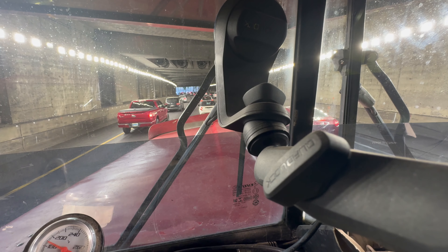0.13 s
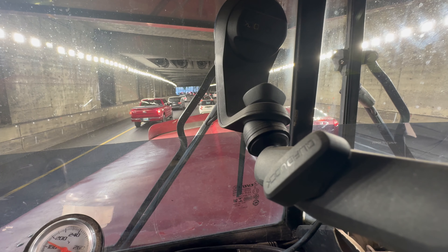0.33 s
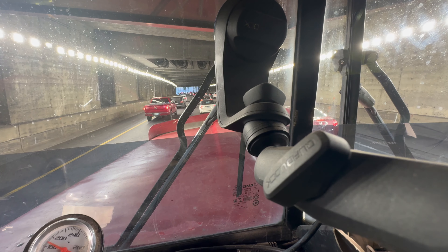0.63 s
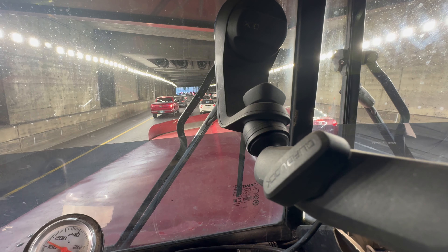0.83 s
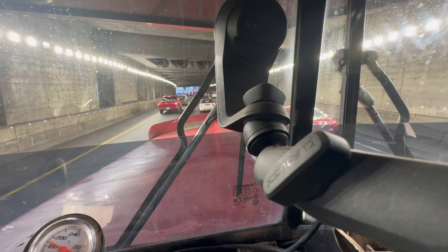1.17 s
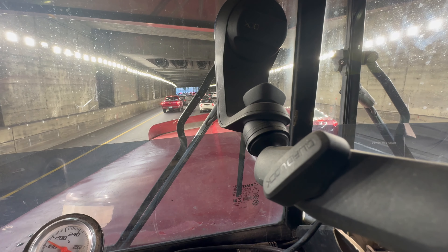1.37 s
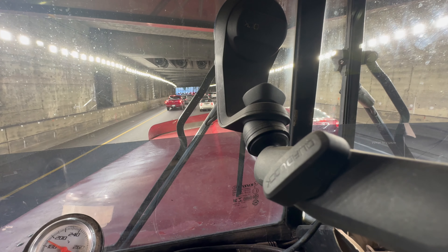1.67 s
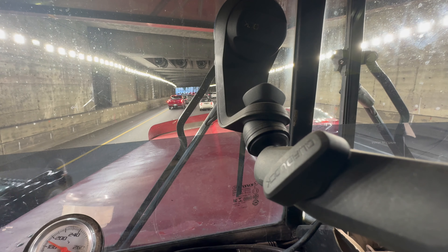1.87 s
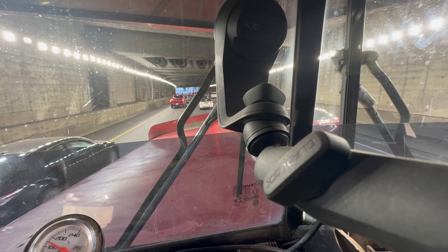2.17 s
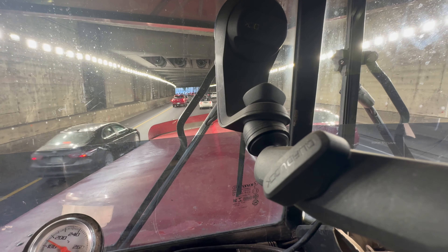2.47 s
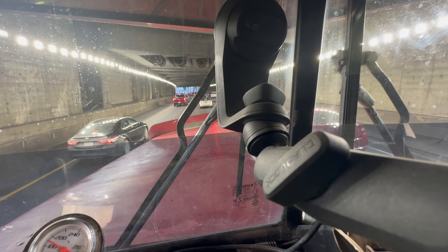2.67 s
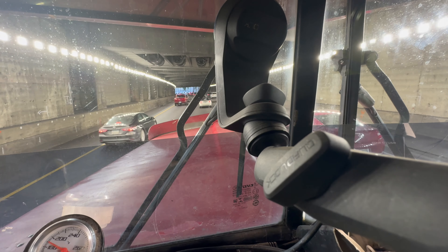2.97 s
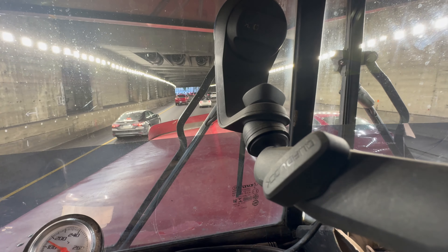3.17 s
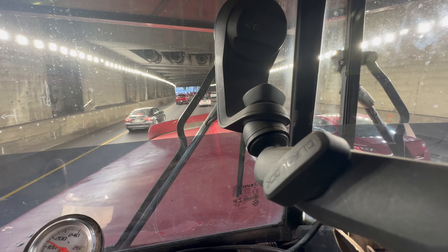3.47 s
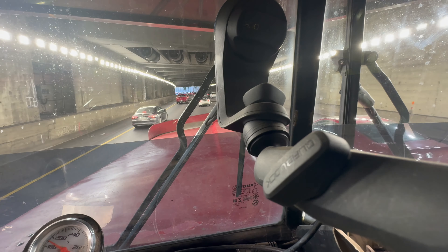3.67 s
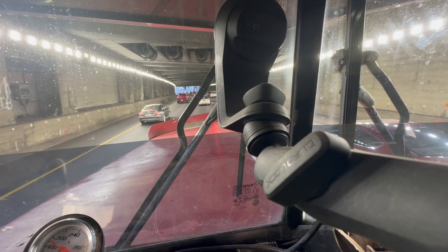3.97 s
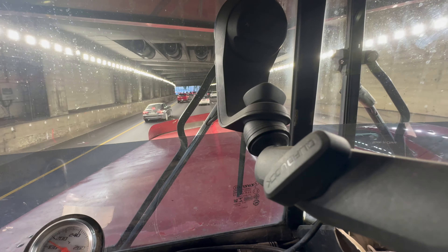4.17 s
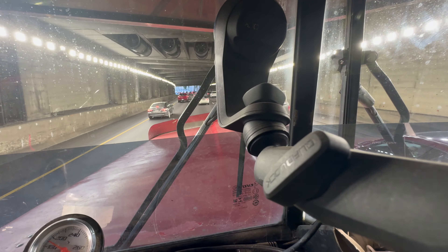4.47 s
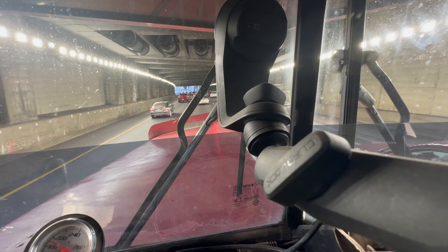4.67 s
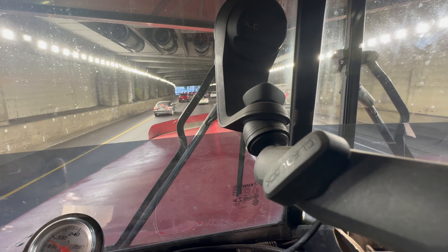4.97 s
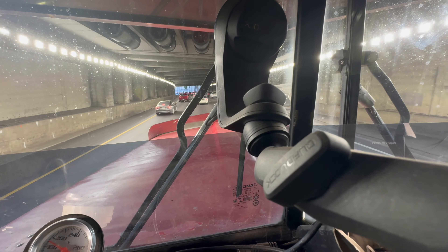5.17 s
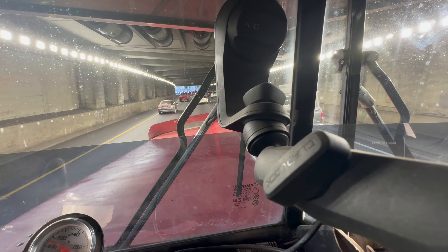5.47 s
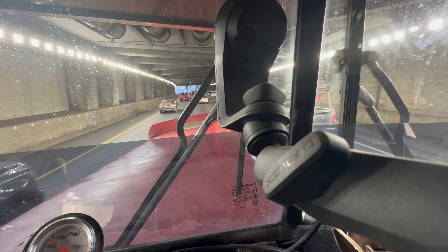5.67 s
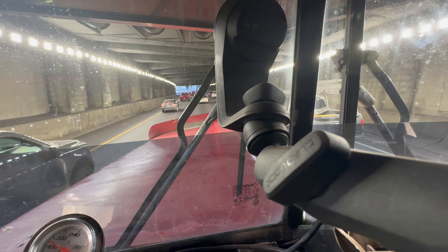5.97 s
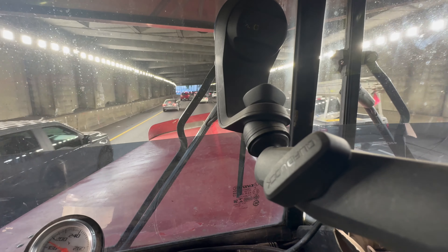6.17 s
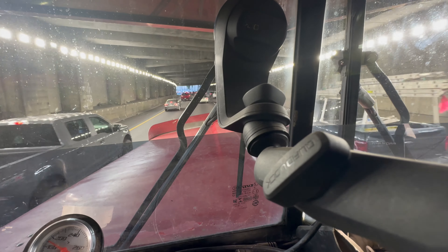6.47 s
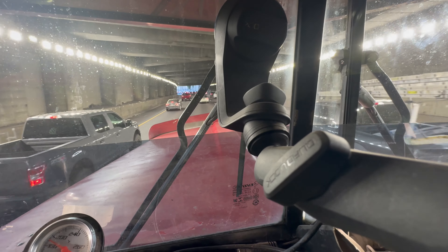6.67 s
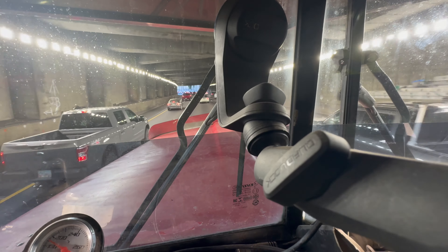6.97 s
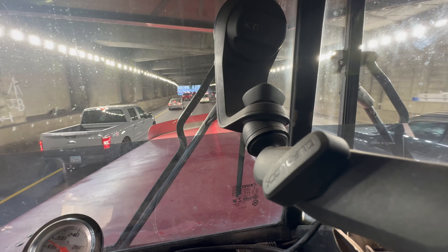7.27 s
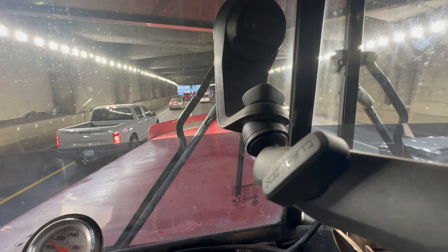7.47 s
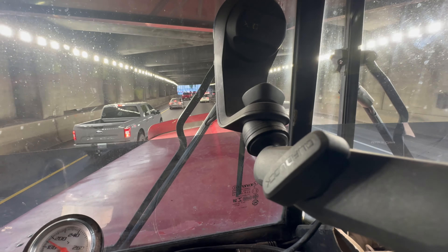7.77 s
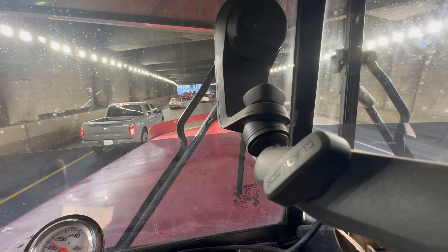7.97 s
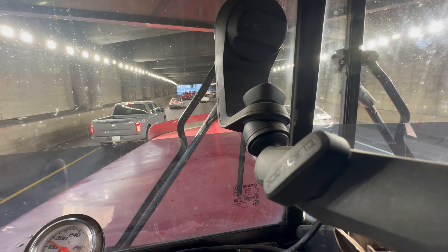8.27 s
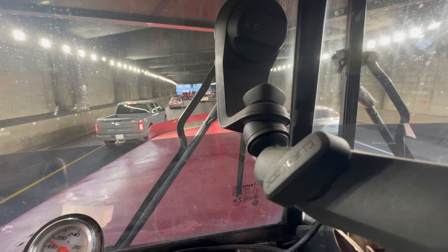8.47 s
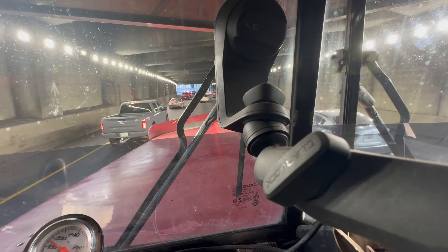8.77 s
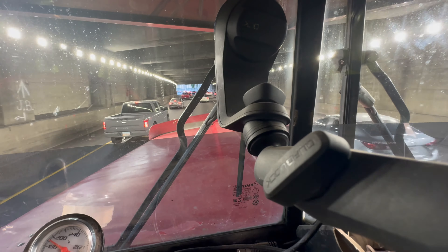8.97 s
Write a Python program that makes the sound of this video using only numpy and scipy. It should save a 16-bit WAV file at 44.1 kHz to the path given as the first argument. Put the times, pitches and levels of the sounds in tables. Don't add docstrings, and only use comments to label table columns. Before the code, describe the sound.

Heard from a stereo microphone on the dashboard of a heavy diesel truck in a tunnel. At first the engine is off load: low rumble, soft clatter, air ticks and dry lever clicks, with a short throttle dab around 0.5 s. From 0.8 to 2.3 s it pulls steadily, low and boomy, with faint gear whine. A hard pull from 2.3 to 3.9 s climbs steeply, with loud raspy exhaust barks and rising turbo whistle and hiss. Around 4.0-4.45 s the load drops; air spits and the lever clicks. The next gear climbs from 4.5 to 5.7 s, barking strongly, then eases. Another pull runs 6.3-7.7 s, ending in a sharp air blow-off near 7.64 s. Spits, small chirps and trim rattles fill the lull until 8.25 s, while tunnel roar swells. A final pull growls upward to the end at about 9.1 s.

```python
import sys
import numpy as np
from scipy import signal
from scipy.fft import rfft, irfft, next_fast_len
from scipy.io import wavfile
from scipy.ndimage import uniform_filter1d

SR = 44100
rng = np.random.default_rng(int(sys.argv[2]) if len(sys.argv) > 2 else 0)


def amplitude_ratio(level_db):
    exponent = np.asarray(level_db, float) / 20
    return 10 ** exponent


def generate_wav(signal):
    frames = np.transpose(np.atleast_2d(signal))
    scaled = np.clip(frames, -1, 1) * 32767
    pcm = np.round(scaled).astype(np.int16)
    wavfile.write(sys.argv[1], SR, pcm)


N = 401751
USUAL_FIRING_HZ, USUAL_TURBO_HZ = 70, 5000


def rms_one(x):
    return x / np.sqrt(np.mean(x ** 2) + 1e-20)


def in_time(rows):
    s, *columns = np.transpose(rows)
    return [np.interp(np.arange(N) / SR, s, column) for column in columns]


def at_hz(points, hz):
    point_hz, value = np.array(points)[:, :2].T
    return np.interp(np.log(hz), np.log(point_hz), value)


def drift(rate):
    r = np.exp(-80 * np.pi * rate / SR)
    slow = signal.lfilter([1], [1, -2 * r, r * r], rng.standard_normal(N // 40 + 2002))[2000:]
    return np.interp(np.arange(N) / 40, np.arange(len(slow)), rms_one(slow))


def resonate(x, hz, width_hz):
    r = np.exp(-np.pi * width_hz / SR)
    poles = [1, -2 * r * np.cos(2 * np.pi * hz / SR), r * r]
    return signal.lfilter([(1 - r * r) / 2, 0, (r * r - 1) / 2], poles, x)


def near(hz, centre_hz, width_hz):
    return 1 / (1 + ((hz - centre_hz) / width_hz) ** 2)


# frequency in Hz, likeness from -1 to 1.
SIDE_LIKENESS = [(45, 0.88), (80, -0.24), (130, -0.96), (170, 0.89), (220, 0.48), (310, -0.27),
                 (1200, -0.77), (1800, 0.18), (2300, 0.092), (9000, -0.1)]
# frequency in Hz, left minus right in dB.
SIDE_LEAN = [(60, -3.5), (110, 2.5), (200, -3), (380, 14), (700, -2), (1290, 0.5), (2380, 1.5), (4400, 5),
             (8120, 9), (15000, -2)]


def stereo_noise(spectrum):
    size = next_fast_len(N)
    hz = np.maximum(np.fft.rfftfreq(size, 1 / SR), 1)
    mid, side = rfft(rng.standard_normal((2, size)))
    alike = np.clip(at_hz(SIDE_LIKENESS, hz), -1, 1)
    lean_db = at_hz(SIDE_LEAN, hz) / 2 * [[1], [-1]]
    pair = np.sqrt(1 + alike) * mid + np.sqrt(1 - alike) * side * [[1], [-1]]
    out = irfft(pair * amplitude_ratio(at_hz(spectrum, hz) + lean_db), size)[:, :N]
    return out / np.sqrt(np.mean(out.mean(0) ** 2))


# time in seconds, firings per second in Hz.
ENGINE_SPEED = [(0.0, 42.26), (0.84, 42.54), (1.22, 50.8), (2.24, 50.5), (2.5, 45.07), (2.72, 46.43),
                (3.0, 60.03), (3.8, 80.65), (4.18, 82.14), (4.48, 68.57), (4.86, 68.1), (5.64, 84.6),
                (5.92, 84.3), (6.32, 66.77), (7.56, 85.5), (7.98, 81.34), (8.38, 65.76), (9.11, 72.9)]
VALVE_MARKS = [1.2794, 1.6384, 1.9963, 2.3549, 2.7478, 3.0671, 3.3476, 3.5988, 3.8268, 4.7509, 5.0123,
               5.2551, 5.4841, 5.6996, 6.4475, 6.7063, 6.9535, 7.187, 7.4103, 7.624, 8.4329, 8.7001, 8.955]


def crank():
    firing_hz, = in_time(ENGINE_SPEED)
    turns = np.cumsum(firing_hz) / SR
    at = (np.ravel(VALVE_MARKS) * SR).astype(int)
    counts = turns[at] - 0.1496
    slip = np.unwrap(counts - np.round(counts), period=1)
    return turns - np.interp(np.arange(N), at, slip), np.round(counts - slip)


# down in seconds, up in seconds, effort 0-1 at the start,
# effort 0-1 at the end, release in seconds.
PEDAL_PRESSES = [
    (0.465, 0.635, 0.75, 0.53, 0.043),
    (0.824, 2.34, 0.57, 0.72, 0.58),
    (2.314, 3.864, 1, 0.74, 0.28),
    (4.461, 5.719, 0.58, 0.78, 0.033),
    (6.283, 7.717, 0.66, 0.67, 0.036),
    (8.267, 9.202, 0.7, 0.62, 0.083),
]


def effort(slower):
    t = np.arange(N) / SR
    presses = []
    for down, up, first, last, release in PEDAL_PRESSES:
        rise = 1 - np.exp(-np.maximum(t - down, 0) / 0.075)
        fall = np.exp(-np.maximum(t - up, 0) / (slower * release))
        presses.append(np.interp(t, [down, up], [first, last]) * rise * fall)
    return np.max(presses, axis=0)


def boost_pressure(push):
    lag_s = 0.63
    keep = np.exp(-1 / (lag_s * SR))
    return signal.lfilter([1 - keep], [1, -keep], push)


LAYER_FOLLOWS = {"drone": (-30.5, 17, -1, -0.2, 2.5), "low": (-29.5, 12.5, -0.83, 1.5, 0.5),
                 "upper": (-44.5, 13.5, 5, -1.5, 2.5), "bark": (-52.5, 22.5, -4, 7.5, 2.2),
                 "rasp": (-58.5, 12, 6.5, -3.5, -0.5), "roar": (-44, 1.5, 8, 1.5, 0.8),
                 "hiss": (-62.5, -1, 10, -3.5, 6.5), "sheen": (-73, 8.5, 15, 1, 4.5)}


def follows(layer, push, boost, firing_hz, turbo_hz):
    idle_db, push_db, boost_db, speed_db, spin_db = LAYER_FOLLOWS[layer]
    load_db = idle_db + push_db * push + boost_db * boost
    engine_db = speed_db * np.log2(firing_hz / USUAL_FIRING_HZ)
    turbo_db = spin_db * np.log2(turbo_hz / USUAL_TURBO_HZ)
    return load_db + engine_db + turbo_db + 1.5 * drift(4.8)


def drone(turns, level_db):
    tone = np.sqrt(2) * np.sin(2 * np.pi * turns + .2 * drift(6)) * (1 + .12 * drift(9))
    return amplitude_ratio(level_db + 3.0) * tone * amplitude_ratio([[.2], [-.2]])


# strength in dB, lateness as share of a firing gap.
CYLINDER_FIRINGS = [(9, 0.027), (5, 0.061), (5.5, -.04), (8, 0.079), (1, -0.068), (10.5, .03)]
CYLINDER_BARK = [2.5, -2.5, 0.5, 1, 2, 5]
CYLINDER_RASP = [-0.5, -2, 2.5, -7.5, -5.5, 3.5]


def firings(turns, marked):
    jitter, scatter_db = .003, .6
    count = int(turns[-1])
    cycle = np.searchsorted((marked[1:] + marked[:-1]) / 2, np.arange(count))
    cylinder = (np.arange(count) - marked[cycle].astype(int)) % 6
    strength_db, late = np.array(CYLINDER_FIRINGS)[cylinder].T
    chance = rng.standard_normal((count, 2))
    moment = np.arange(count) + .5 + late + jitter * chance[:, 0]
    at = np.interp(moment, turns, np.arange(N)).astype(int)
    uneven_db = scatter_db * chance[:, 1]
    depth = np.clip(1.4 + .15 * drift(3)[at], 0, 2.4)
    dull, sharp, rasp = np.zeros((3, N))
    dull[at] = amplitude_ratio(strength_db + uneven_db)
    sharp[at] = amplitude_ratio(np.array(CYLINDER_BARK)[cylinder] * depth + uneven_db)
    rasp[at] = amplitude_ratio(np.array(CYLINDER_RASP)[cylinder] + uneven_db)
    return dull, sharp, rasp


def cab(pulses, modes, band_hz, level_db, patchy_db):
    out = np.zeros((2, N))
    for k, (hz, width_hz, left_db, right_db, side) in enumerate(modes):
        ringing = resonate(resonate(pulses, hz, width_hz), hz, 2.16 * width_hz)
        ringing = ringing * amplitude_ratio(patchy_db * drift(2.6))
        gains = amplitude_ratio([left_db, right_db]) * [1, np.sign(side)]
        out += ringing * gains[:, None] * (-1) ** k
    band = signal.butter(4, band_hz, "band", fs=SR, output="sos")
    within = signal.sosfilt(band, out.mean(0))
    return out / np.sqrt(uniform_filter1d(within ** 2, size=SR // 4) + 1e-12) * amplitude_ratio(level_db)


# frequency in Hz, width in Hz, left level in dB,
# right level in dB, sign (+1 sides in step, -1 opposed).
CAB_MODES = [(46.7, 24, 3, 3, 1), (89.4, 25, 3.5, -1, 1), (127.9, 27.9, 4, 6, 1), (162, 48, 0.5, 1.5, -1),
             (218.66, 17.3, -4, 4, 1), (252.8, 54.4, -14.5, -8.5, 1), (294, 21, -5.5, -12, -1),
             (333.3, 19, -8.5, -16, -1), (368.8, 27, -7.5, -5.5, -1), (415.6, 11.8, 0, -7, -1),
             (464.7, 43, 0, -4, -1), (479, 62, -7.5, -8.5, -1), (516, 94, -37, -23, 1),
             (613, 19, -23, -18.5, -1), (716.4, 60, -17.5, -28, -1)]


def cab_pulses(turns, firing_hz, push, boom, trains, levels_db):
    dull, sharp, rasp = trains
    low_db, upper_db, bark_db, rasp_db = levels_db
    phase = 2 * np.pi * turns
    line = 2 * firing_hz / SR
    second = (.45 + 1.4 * boom) * np.clip((low_db + 26) / 8, -.6, 1)
    dull = dull + line * (.8 * np.cos(phase) + second * np.cos(2 * phase))
    dull = dull - line * 0.11 * push * np.cos(3 * phase)
    shake = rng.standard_normal((2, N)) * .0017 * amplitude_ratio(-.62 * (low_db + 15))
    bright = (sharp + rasp) / 2 + shake[1] + line * 0.17 * push * np.cos(4 * phase)
    barks = sharp ** 1.2 + shake[1]
    out = cab(dull + shake[0], CAB_MODES[:5], [105, 250], low_db, 1)
    out += cab(bright, CAB_MODES[5:10], [260, 430], upper_db, 1.2)
    out += cab(barks, CAB_MODES[10:13], [430, 600], bark_db, 1.2)
    return out + cab(rasp + shake[0], CAB_MODES[13:15], [600, 800], rasp_db, 1.2)


# multiple of the firing rate, mode in Hz,
# width in Hz, left level in dB, right as share of left.
PANEL_THRUMS = [(2.001, 92, 4.4, -15.5, 1), (3, 250, 5.8, -29, 3.5), (3.999, 240, 9.8, -30, 2.5),
                (4, 310, 5.9, -21.5, -0.06), (5, 286.5, 11.3, -18, 1.14), (6, 287, 5.1, -19, -0.25),
                (2.667, 215, 9.9, -28, 3.5), (6, 429, 34, -34, 1.2), (7, 440, 16, -33, 2.1),
                (1.8333, 126.3, 5, -20, 1.2), (1.6667, 132, 4, -21, 0.9), (2.1667, 126, 8, -22, 1.2),
                (2.3333, 123.5, 9.5, -18.5, 1.04), (2.6667, 127, 9.8, -18.5, 1.3),
                (3.001, 140, 6, -17.5, 1.1), (2.002, 84, 3, -17.5, 1.2), (1, 78.5, 3.7, -20.5, 1.1),
                (3, 243, 8, -29, 1.1), (4, 200, 4, -25, 1.9), (7.5, 373, 5, -31, -0.2),
                (3, 209.5, 8, -31, 1.6), (4, 274, 7.9, -21.5, -0.07), (4.5, 287, 8, -20, 0.04),
                (4.3333, 290, 6.1, -22, -0.1), (5.5, 450, 20, -29.5, 0.23), (5.8333, 470, 20, -28, 0.3)]


def thrums(turns, firing_hz, push):
    out = np.zeros((2, N))
    for multiple, hz, width_hz, db, share in PANEL_THRUMS:
        level = amplitude_ratio(db + 2.0 * drift(3.9)) * push * near(multiple * firing_hz, hz, width_hz)
        out += level * np.sin(2 * np.pi * multiple * turns) * [[1], [share]]
    return out


def rings(rows, rise_s, fade_s, gain_db, right):
    out, t = np.zeros(N + SR), np.arange(SR // 10) / SR
    shape = (1 - np.exp(-t / rise_s)) * np.exp(-t / fade_s)
    shape = shape / shape.max()
    for s, peak_db, hz in rows:
        out[round(s * SR):][:len(t)] += amplitude_ratio(peak_db + gain_db) * shape * np.sin(2 * np.pi * hz * t)
    return out[:N] * [[1], [right]]


# start in seconds, peak in dB, pitch in Hz.
STACK_YAPS = [(1.403, -24.5, 427), (1.655, -27, 440), (1.765, -24, 440), (2.054, -24, 434),
              (2.174, -39, 393), (2.867, -21, 418), (2.968, -12.5, 450), (3.067, -20.5, 472),
              (3.163, -11.5, 431), (3.256, -16, 485), (3.408, -19, 404), (3.491, -35, 477),
              (3.599, -25, 475), (3.899, -17.5, 460), (3.975, -28, 428), (4.107, -28, 393),
              (4.842, -23.5, 400), (4.897, -16.5, 416), (5.013, -12.5, 450), (5.092, -13.5, 467),
              (5.175, -34, 412), (5.255, -19.5, 486), (5.335, -19, 430), (5.41, -16, 470),
              (5.555, -27, 450), (5.628, -24, 400), (5.905, -32, 484), (6.45, -36, 450), (6.537, -26, 473),
              (6.62, -25, 398), (6.706, -19, 478), (6.792, -19, 480), (6.874, -24, 440), (7.082, -33, 393),
              (7.2, -29, 460), (7.309, -21, 464), (7.372, -24, 474), (7.515, -27, 393), (7.632, -18, 485),
              (7.691, -30, 467), (8.431, -21, 440), (8.485, -22, 430), (8.613, -20, 470), (8.655, -21, 470),
              (8.699, -18.5, 480), (8.841, -17, 442), (8.872, -19, 470), (8.929, -33, 423),
              (9.038, -22, 466)]
# start in seconds, peak in dB, pitch in Hz.
DASH_KNOCKS = [(0.541, -29, 730), (1.57, -29.5, 684), (2.109, -26.5, 710), (2.226, -23, 705),
               (2.48, -25, 670), (2.54, -24, 716), (2.61, -29, 656), (2.785, -18, 710), (2.856, -28, 736),
               (3.056, -23, 746), (3.424, -26, 710), (5.093, -29, 724), (5.322, -20.5, 720),
               (5.401, -27, 740), (5.474, -28, 730), (5.656, -37, 750), (6.526, -25, 608),
               (6.698, -25, 757), (6.768, -24, 706), (6.863, -21.5, 714), (7.772, -33, 885),
               (8.601, -25, 676), (8.688, -35, 662), (8.776, -26, 923), (8.975, -31, 741)]
# start in seconds, peak in dB, pitch in Hz.
TRIM_RATTLES = [(0.5146, -41, 1940), (0.8708, -41, 2040), (1.8113, -37, 1096), (2.4377, -32, 1124),
                (2.8376, -29.5, 1650), (4.2306, -28, 1590), (4.475, -33, 1600), (4.6104, -38, 1090),
                (5.1381, -39, 1680), (6.7663, -32.5, 1127), (7.7823, -26, 1130), (7.8971, -27, 1170),
                (8.1544, -32, 1084)]


def yaps_knocks_and_rattles():
    out = rings(STACK_YAPS, rise_s=0.0027, fade_s=0.0092, gain_db=1.5, right=0.19)
    out += rings(DASH_KNOCKS, rise_s=0.0017, fade_s=0.013, gain_db=1.5, right=.1)
    return out + rings(TRIM_RATTLES, rise_s=.004, fade_s=0.011, gain_db=-4, right=0.48)


# frequency in Hz, level in dB per Hz.
ROAR_SPECTRUM = [(330, -17), (560, -2.5), (648, -5.5), (1140, -11), (1440, -14), (1670, -17), (2270, -19.5),
                 (2940, -22.5), (5000, -34), (6500, -70.5), (11000, -120)]
# frequency in Hz, width in Hz, level in dB.
BLOCK_RINGS = [(711, 51, -5), (914, 74, 1.5), (1137, 42, 6), (1258, 41, 2), (1590, 57, 0.5),
               (1950, 26, -2.5), (2660, 21, -11), (3910, 23, -1)]


def clatter(sharp, level_db):
    gate, tail_s = 0.11, 0.0071
    flare = rms_one(signal.lfilter([1], [1, -np.exp(-1 / (tail_s * SR))], sharp))
    noise = stereo_noise(ROAR_SPECTRUM) * (1 - gate + gate * flare)
    ringing = sum(resonate(noise, hz, width_hz) * amplitude_ratio(db + 2.6 * drift(7.2))
                  for hz, width_hz, db in BLOCK_RINGS)
    return (noise + ringing) * amplitude_ratio(level_db - 2.0)


def whistle(hz, level_db, blur_hz, pan_db):
    tone = np.sin(2 * np.pi * np.cumsum(hz) / SR)
    return tone * (.5 + .85 * drift(blur_hz)) * amplitude_ratio(level_db) * amplitude_ratio([[pan_db], [-pan_db]])


# time in seconds, pitch in Hz.
TURBO_SPEED = [(0, 2000), (1.1, 2350), (2.0, 2900), (2.6, 3200), (3.1, 3800), (3.5, 4500), (3.92, 5400),
               (4.2, 5050), (4.58, 4720), (4.9, 4980), (5.5, 6250), (5.75, 6650), (6.35, 5680),
               (7.08, 6820), (7.6, 8500), (8.0, 7900), (8.4, 7000), (9.11, 8200)]


def turbo_pitch():
    return in_time(TURBO_SPEED)[0]


# pitch in Hz, level in dB.
WHISTLE_LEVEL = [(2000, -80), (2350, -63), (3400, -54.5), (5000, -61), (6500, -66), (8500, -67)]
# frequency in Hz, level in dB per Hz.
HISS_SPECTRUM = [(2500, 1), (4000, -0.5), (6000, -1.5), (8000, -10.5), (10000, -10.5)]
# frequency in Hz, level in dB per Hz.
SHEEN_SPECTRUM = [(5000, -9.5), (7000, -4), (9000, -4), (11000, 1.5), (13000, -30), (15000, -23),
                  (16000, -29)]


def turbo(hz, firing_hz, hiss_db, sheen_db):
    speed_db = 18 * np.log2(np.maximum(firing_hz / USUAL_FIRING_HZ, .92))
    level_db = at_hz(WHISTLE_LEVEL, hz) + speed_db
    tones = whistle(hz, level_db + 3, 220, 1.5) + whistle(2 * hz, level_db - 8, 250, .6)
    flutter_db = 0.38 * drift(19.0)
    hiss = stereo_noise(HISS_SPECTRUM) * amplitude_ratio(hiss_db + 5.0 + flutter_db)
    return tones + hiss + stereo_noise(SHEEN_SPECTRUM) * amplitude_ratio(sheen_db - 2.0 + flutter_db)


def spits(rows, gain_db, spread, rise_s=0.0038):
    out = np.zeros((2, N))
    t = np.arange(SR // 5) / SR
    noise = rng.standard_normal((len(rows), 3, len(t)))
    for (s, peak_db, hz, hold, fade, pan_db), (both, *own) in zip(rows, noise):
        fading = np.exp(-np.maximum(t - hold, 0) / max(fade, .002) * 1.1)
        shape = np.clip(t / rise_s, 0, 1) * fading
        edges = [hz / spread, min(hz * spread, 16000)]
        band = signal.butter(2, edges, "band", fs=SR, output="sos")
        jet = rms_one(signal.sosfilt(band, 0.42 * both + np.array(own)))
        burst = jet * shape * amplitude_ratio([[pan_db / 2], [-pan_db / 2]]) * amplitude_ratio(peak_db + gain_db)
        at = round(s * SR)
        out[:, at:at + len(t)] += burst[:, :N - at]
    return out


# start in seconds, peak in dB, pan in dB.
AIR_SPITS = [(0.006, -39.5, 1), (0.3646, -44, 8), (0.464, -37.5, 8), (0.511, -41, 19), (0.677, -46, 7),
             (0.743, -52, 11), (1.117, -46.5, 9), (2.746, -39, 9), (4.02, -47, 5), (4.058, -42.5, 16),
             (4.244, -35, 12.5), (4.428, -42, 10), (4.4447, -44, 11), (6.154, -40, 12.5), (7.386, -44, -3),
             (8.2073, -34, 15), (8.228, -37, 14.5), (8.264, -41, 9), (8.304, -42, 5), (9.095, -42, 2)]
# start in seconds, peak in dB, centre in Hz, hold in seconds.
BLOW_OFF_JETS = [
    (7.64, -36, 3550, 0.019),
    (7.636, -34, 9100, 0.018),
    (7.637, -35, 10800, 0.027),
    (4.227, -42, 1800, 0.021),
    (4.23, -46, 3900, 0.012),
    (4.243, -44, 9600, 0.016),
    (7.665, -43, 5500, 0.022),
]
# start in seconds, peak in dB, pan in dB.
LEVER_CLICKS = [(0.3642, -41, 7), (0.464, -39, 7), (0.511, -39, 12), (0.677, -42, 9), (1.117, -45, 10),
                (4.023, -36, 7.5), (4.2342, -40, 14), (4.3594, -40, 7), (4.4267, -37, 12), (4.440, -39, 10),
                (4.446, -38, 12)]
# start in seconds, peak in dB, centre in Hz, hold in seconds.
VALVE_CHIRPS = [
    (8.13, -47, 6100, .026),
    (8.18, -50, 4300, .032),
    (8.26, -50, 4050, .06),
    (7.5, -49, 3500, .078),
    (8.25, -45, 1984, .07),
    (4.055, -51, 14400, .02),
    (8.21, -53, 14300, .03),
    (7.79, -53, 14300, .03),
]


def air():
    ticks = [(s, db, 7460, 0.0022, 0.019, pan_db) for s, db, pan_db in AIR_SPITS]
    jets = [(*row, 0.012, 7.5) for row in BLOW_OFF_JETS]
    clicks = [(s, db, 7600, 0, .0025, pan_db) for s, db, pan_db in LEVER_CLICKS]
    chirps = [(*row, 0.028, 12) for row in VALVE_CHIRPS]
    out = spits(ticks, gain_db=-5.5, spread=9.9) + spits(jets, gain_db=5.0, spread=1.32)
    out += spits(clicks, gain_db=-4.0, spread=1.4, rise_s=.0004)
    return out + spits(chirps, gain_db=-2, spread=1.05)


# time in seconds, half length in seconds, swell in dB.
PASSING_SWELLS = [
    (0.575, 0.076, 7.5),
    (1.037, 0.15, 4.5),
    (3.046, 0.5, 3),
    (4.426, 0.08, 3),
    (5.202, 0.2, 2),
    (6.01, 0.89, 2),
    (7.962, 0.64, 4.5),
]


def swells():
    t = np.arange(N) / SR
    return sum(db * np.exp(-((t - s) / half) ** 2) for s, half, db in PASSING_SWELLS)


# frequency in Hz, level in dB per Hz.
RUMBLE_SPECTRUM = [(25, -26), (40, -18.5), (70, -7.5), (110, -0.5), (200, -10), (400, -19), (600, -59.5)]


def rumble(low_db):
    return stereo_noise(RUMBLE_SPECTRUM) * amplitude_ratio(.5 * low_db - 22)


# time in seconds, level in dB.
WHINE_LEVEL = [(0, -90), (.9, -88), (1.2, -63), (2.3, -63), (2.6, -88), (9.11, -90)]


def gear_whine(firing_hz):
    return whistle(75 * firing_hz, *in_time(WHINE_LEVEL), 60, -.6)


def scene():
    turns, marked = crank()
    firing_hz = uniform_filter1d(np.gradient(turns) * SR, size=SR // 20)
    turbo_hz = turbo_pitch()
    push = effort(0.54)
    boost = boost_pressure(push)
    layers = ("low", "upper", "bark", "rasp", "roar", "hiss", "sheen")
    low_db, upper_db, bark_db, rasp_db, roar_db, hiss_db, sheen_db = [
        follows(layer, push, boost, firing_hz, turbo_hz) for layer in layers]
    drone_db = follows("drone", effort(1.9), boost, firing_hz, turbo_hz)
    boom = push * near(2 * firing_hz, 133, 13.2)
    low_db, bark_db = low_db + 6.5 * boom, bark_db + 3.5 * boom
    swell_db = swells()
    trains = firings(turns, marked)
    out = drone(turns, drone_db) + thrums(turns, firing_hz, push)
    out += cab_pulses(turns, firing_hz, push, boom, trains, (low_db, upper_db, bark_db, rasp_db))
    out += yaps_knocks_and_rattles() + clatter(trains[1], roar_db + swell_db)
    out += turbo(turbo_hz, firing_hz, hiss_db + swell_db, sheen_db) + air()
    return out + rumble(low_db) + gear_whine(firing_hz)


def roll_off(x):
    return signal.sosfilt(signal.butter(12, 15820, fs=SR, output="sos"), x)


def record(dry):
    low = signal.sosfiltfilt(signal.butter(8, 9400, fs=SR, output="sos"), dry)
    treble = (dry - low).mean(0) * 0.73
    top = signal.sosfilt(signal.butter(8, 15400, fs=SR, output="sos"), treble)
    x = low + [np.roll(top, 8), np.roll(top, -8)]
    return roll_off(1.04 * np.tanh(x / .9))


dry = scene()
out = record(dry)
generate_wav(out)
```